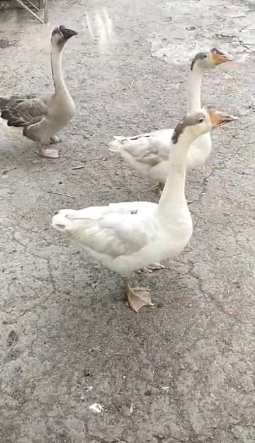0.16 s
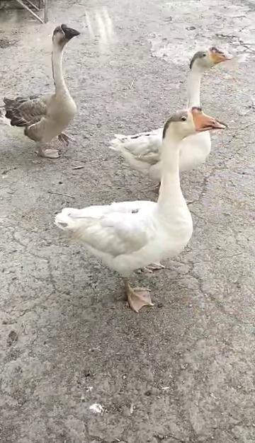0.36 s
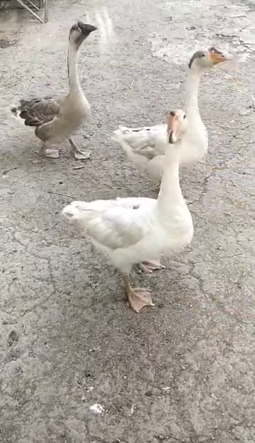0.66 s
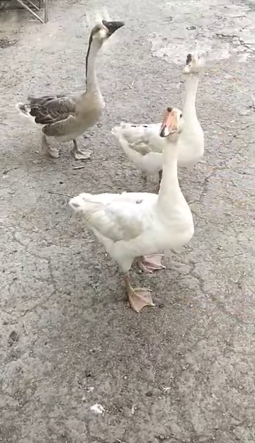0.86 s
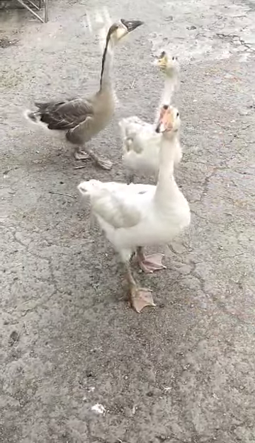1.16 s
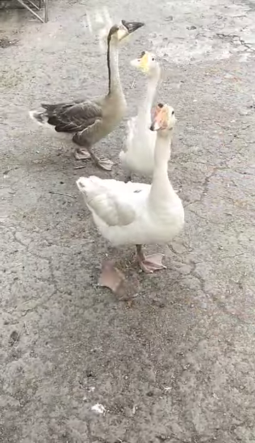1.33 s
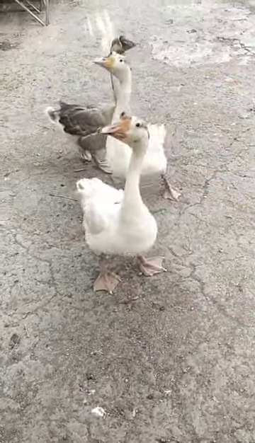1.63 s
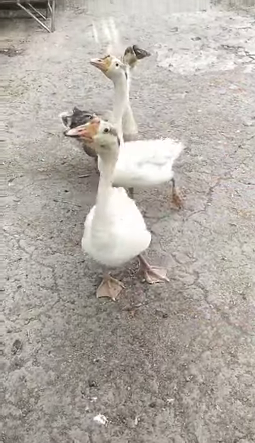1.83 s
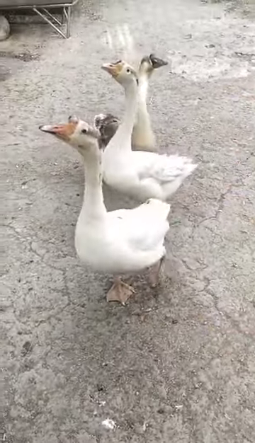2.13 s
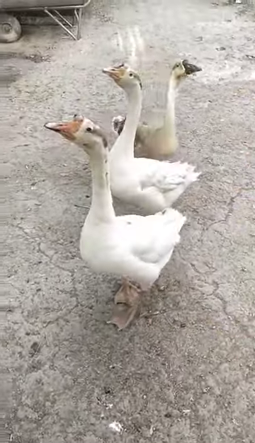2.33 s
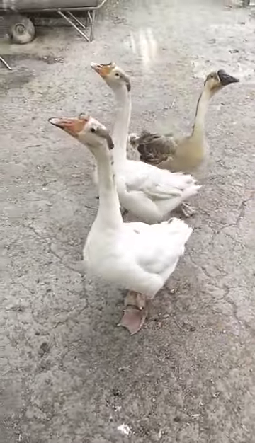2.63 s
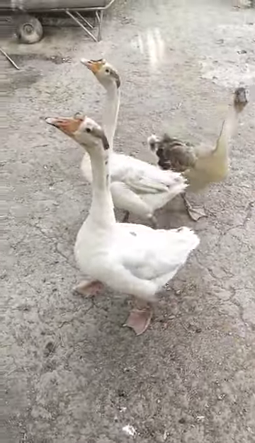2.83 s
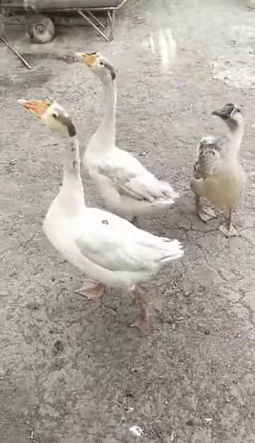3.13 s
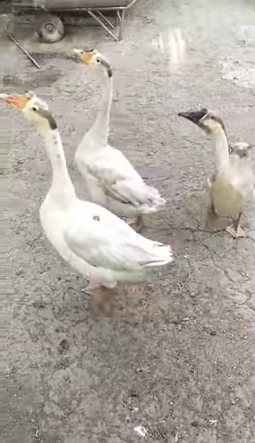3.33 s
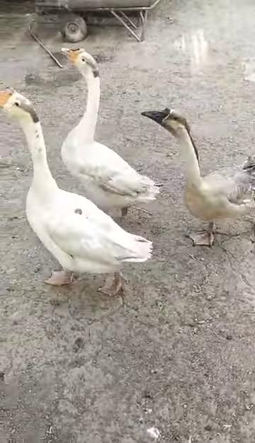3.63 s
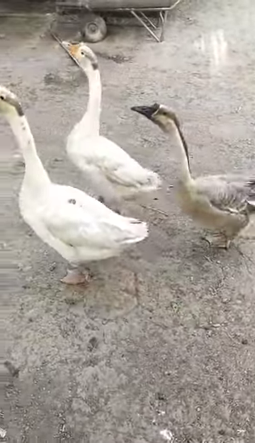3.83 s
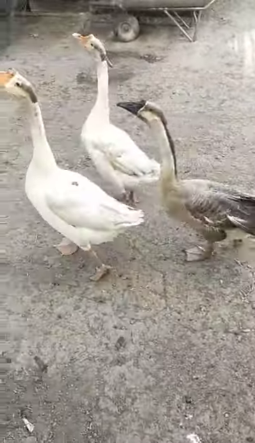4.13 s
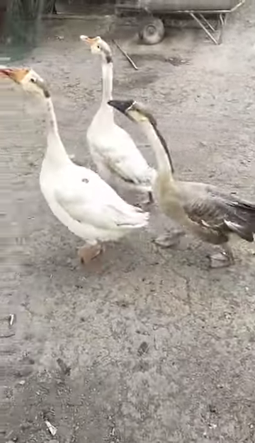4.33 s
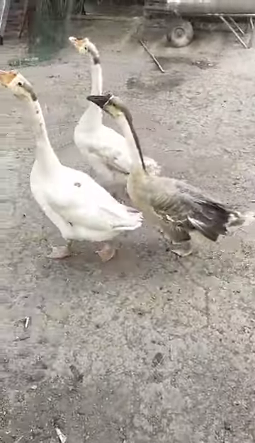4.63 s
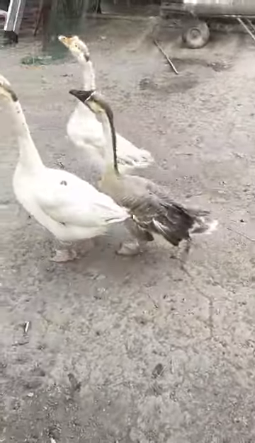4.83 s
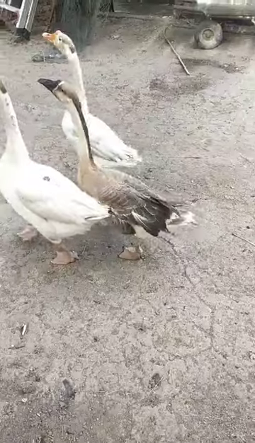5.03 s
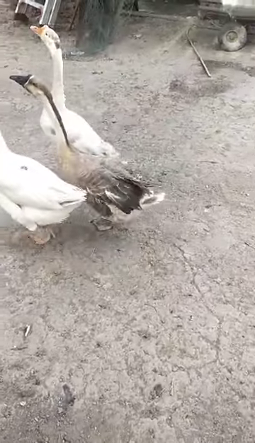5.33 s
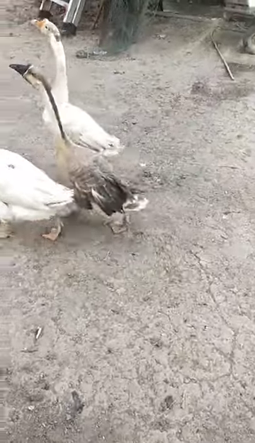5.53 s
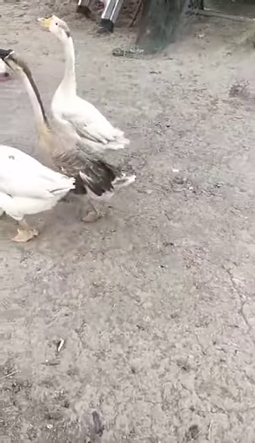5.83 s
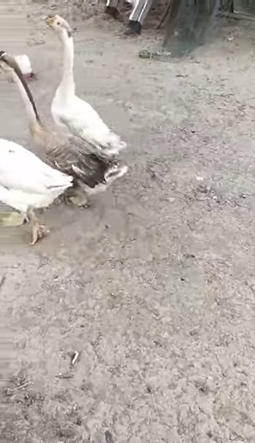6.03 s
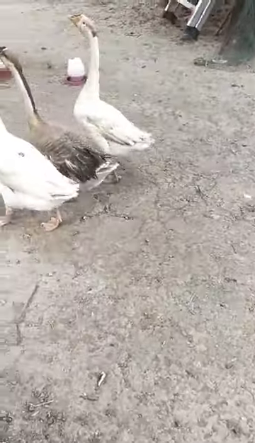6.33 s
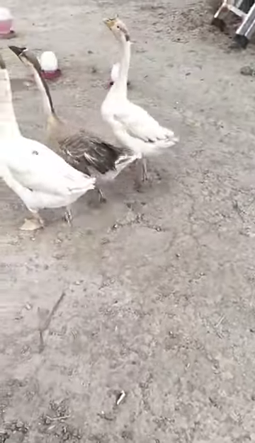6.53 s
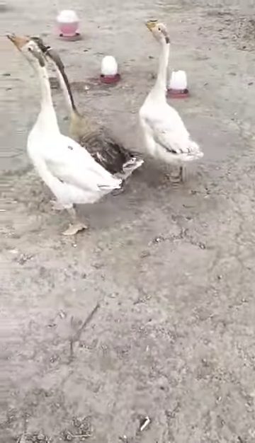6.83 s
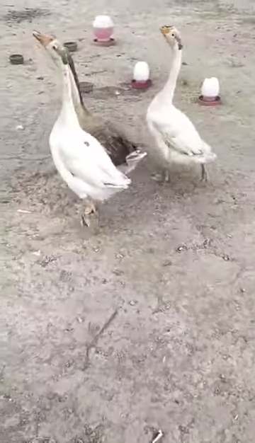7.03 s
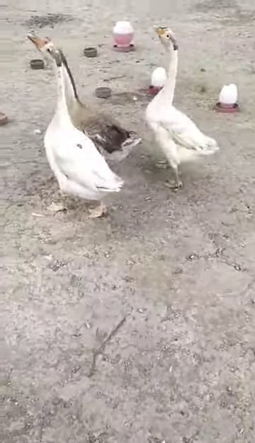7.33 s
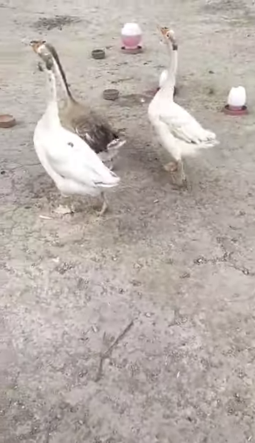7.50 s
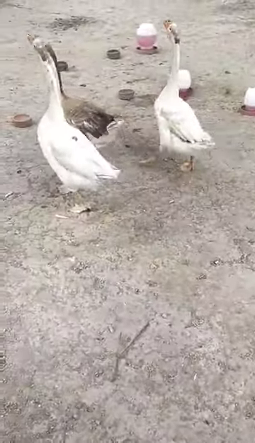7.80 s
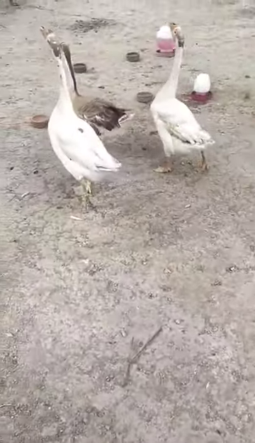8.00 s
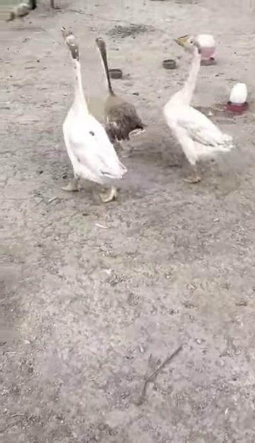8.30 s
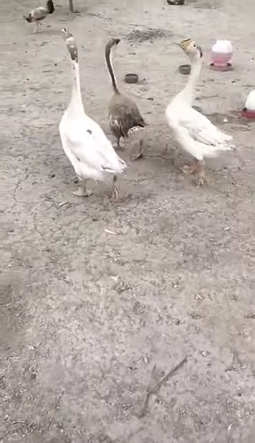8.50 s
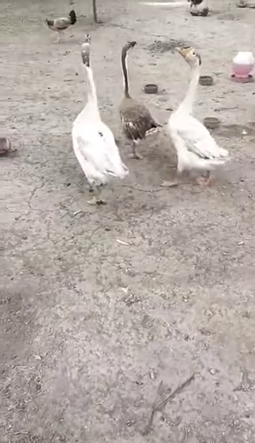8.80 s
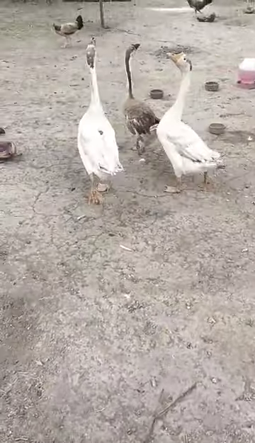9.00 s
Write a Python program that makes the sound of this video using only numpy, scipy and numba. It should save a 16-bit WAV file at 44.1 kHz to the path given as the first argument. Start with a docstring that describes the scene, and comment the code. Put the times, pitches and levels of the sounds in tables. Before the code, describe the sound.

Three geese close by give hoarse, rattling honks that break into brassy trumpet notes, sparse at first, then crowding together, in a quiet open farmyard.

```python
"""Three geese honk a step or two from a phone with two microphone ports, in an open farmyard.
The calls are hoarse rattles of syrinx pulses that ring the windpipe and the open bill.
Many break into clear trumpet notes: gliding harmonics with a buzz of weaker lines between them.
Wheezes and, at the start, a distant chick's high peep are gliding narrow bands of noise; feet on grit tick.
A weak yard echo follows the birds; behind lies a low outdoor rumble of filtered noise."""
import sys
import numpy as np
from scipy import signal
from scipy.fft import rfft, irfft
from scipy.io import wavfile
from scipy.ndimage import uniform_filter1d
from numba import njit

SR = 44100
rng = np.random.default_rng(int(sys.argv[2]) if len(sys.argv) > 2 else 0)


def wav_out(sig):
    """Save sig, one row per channel (or a flat mono array), as 16-bit PCM at SR to the path in sys.argv[1]."""
    wavfile.write(sys.argv[1], SR, np.round(np.clip(np.atleast_2d(sig).T, -1, 1) * 32767).astype(np.int16))


N = 403956
TIME = np.arange(N) / SR

# hoarse calls, with levels and resonances at full effort: start_s, rise_s, hold_s, release_s, swell_db,
# body_db, open_bill_db, rasp_db, hiss_db, sizzle_db, windpipe_hz, bill_hz, body_left_minus_right_db
HOARSE_CALLS = [(0.217, .13, 0.13, 0.027, 16.5, -37.5, -46, -54.5, -66.5, -82, 1060, 3030, -0.5),
                (0.472, 0.1, 0.068, 0.084, 4, -22, -32.5, -36.5, -57, -55.5, 964, 3460, -1),
                (0.61, .19, 0.047, 0.19, 5, -19.5, -30, -35, -38.5, -41.5, 1050, 3350, 1),
                (1.522, 0.19, 0.11, 0.16, 7.5, -21, -30, -34, -64, -49.5, 1000, 2770, 0.5),
                (2.087, 0.018, 0.082, 0.18, 11, -22, -25.5, -35, -42, -46.5, 1204, 4000, 1),
                (2.922, 0.18, 0.045, 0.05, 7, -25.5, -35.5, -41.5, -61, -60, 958, 2940, -0.5),
                (3.114, 0.069, 0.079, 0.17, 13.5, -24, -35, -41, -55.5, -60, 938, 3000, 0.5),
                (3.418, 0.046, 0.17, 0.2, 5, -22.5, -28.5, -36, -42, -49.5, 1098, 3390, 0),
                (4.051, 0.3, 0.51, 0.1, 10, -28, -34.5, -47.5, -62.5, -68.5, 1064, 3080, 0.5),
                (4.499, 0.077, 0.12, 0.2, 13, -26.5, -36.5, -42, -55, -62, 1087, 3200, 0),
                (4.709, 0.079, 0.073, 0.33, 7, -24.5, -41.5, -37, -49, -58, 985, 2980, -3),
                (4.957, 0.24, 0.081, 0.07, 10.5, -22.5, -27, -32.5, -43, -51, 974, 3000, 1.5),
                (5.267, 0.027, 0.035, 0.17, 2, -44, -35, -37, -39.5, -49, 940, 2700, 0),
                (5.695, 0.03, 0.091, 0.22, 8, -30, -33.5, -41.5, -47, -53, 1038, 3930, 2),
                (6.936, 0.061, 0.13, 0.13, 4.5, -28.5, -33.5, -39.5, -49.5, -50.5, 1045, 4030, 3),
                (7.124, 0.05, 0.044, 0.19, 22, -23.5, -34, -41, -54, -54, 1113, 4000, 3),
                (7.388, 0.017, 0.083, 0.15, 16, -23, -20.5, -33, -37.5, -44, 1040, 4340, 1),
                (7.472, 0.043, 0.13, 0.29, -4.5, -28.5, -31, -35, -40, -46.5, 1060, 4400, 4.5),
                (7.796, 0.071, 0.14, 0.17, 11.5, -41, -39, -52.5, -58.5, -57.5, 1045, 4050, 0.5),
                (8.1, 0.031, 0.045, 0.068, 9, -23.5, -25, -43, -42.5, -49, 1087, 4400, 0),
                (8.168, 0.048, 0.13, 0.26, 0, -38, -37, -35, -42, -48, 1040, 4280, -5),
                (8.405, 0.025, 0.044, 0.16, 6, -21, -36, -36.5, -61, -57.5, 1067, 2770, 3)]
# slap rate and unevenness of the syrinx, call after call: time_s, pulse_rate_hz, roughness (0-1)
SYRINX_PULSES = [(.24, 112, .05), (.42, 118, .1), (.47, 145, .35), (.63, 174, .3), (.82, 176, .5),
                 (1.02, 140, .4), (1.52, 146, .4), (1.76, 176, .35), (1.97, 148, .3), (2.09, 150, .7),
                 (2.16, 165, .6), (2.3, 138, .3), (2.92, 136, .35), (3.03, 156, .05), (3.13, 168, .4),
                 (3.22, 173, .25), (3.39, 140, .5), (3.42, 150, .6), (3.52, 158, .4), (3.63, 147, .2),
                 (3.8, 140, .45), (4.06, 112, .2), (4.2, 128, .12), (4.4, 132, .14), (4.47, 140, .15),
                 (4.53, 150, .75), (4.65, 148, .55), (4.8, 146, .4), (4.93, 148, .5), (5.02, 168, .6),
                 (5.27, 176, .5), (5.43, 152, .3), (5.69, 150, .6), (5.77, 158, .45), (5.9, 141, .35),
                 (6.94, 140, .5), (7., 156, .5), (7.2, 150, .25), (7.36, 140, .5), (7.4, 160, .8),
                 (7.6, 175, .45), (7.78, 158, .6), (7.86, 130, .5), (8.1, 150, .7), (8.25, 162, .6),
                 (8.47, 149, .6), (8.58, 138, .4)]
# weaker resonances that move with the windpipe's: multiple of its frequency, level_db
WINDPIPE_OVERTONES = [(0.601, -19.5), (1.25, -2.5), (1.73, -13.5), (2.02, -17)]
# relative response of throat and bill: frequency_hz, gain_db
THROAT_RESPONSE = [(90, -32), (155, 4.5), (240, -14.5), (430, 5.5), (800, 5.5), (1450, 3.5), (1800, -2),
                   (2450, -8.5), (3120, 2.5), (3850, -4.5), (4900, -2), (5700, -16.5), (7100, -14.5),
                   (8800, -18), (11000, -20.5)]
# clear notes within the calls: start_s, attack_s, hold_s, release_s, top_pitch_hz, scoop_hz, fall_hz,
# level_db, octave_db, third_harmonic_db, buzz_share (0-1), fundamental_left_minus_right_db
CLEAR_NOTES = [(0.615, 0.03, 0.18, .14, 884.3, 14, 132.5, -19.5, -26.5, -35, 0.97, 1.5),
               (0.763, 0.038, 0.026, 0.08, 1117, -16, 47.5, -20, -31, -48.5, .4, 36.5),
               (1.709, 0.037, 0.053, 0.16, 879.5, -4, 141.5, -22, -27.5, -32.5, 0.7, 0),
               (2.102, 0.015, 0.08, 0.038, 1091, 20.5, 34, -24.5, -41, -51, 0.7, -32),
               (3.169, 0.012, 0.028, 0.054, 863.6, -9, 12, -18.5, -29.5, -39, 0.3, 5.5),
               (3.447, 0.05, 0.031, 0.11, 1110, 20.5, 27.5, -18.5, -35, -41, 0.89, -13),
               (3.591, 0.029, 0.036, 0.02, 894, 1.5, 6, -20, -29, -44, 0, 5.5),
               (5.076, 0.058, 0.025, 0.1, 866, 4.5, 4, -26, -39, -47, 0, 7),
               (5.259, 0.041, 0.015, 0.11, 889, -16, 129, -16.5, -28.5, -39, 0.03, 0.5),
               (5.723, 0.04, 0.029, 0.051, 1092, 21.5, 21, -28.5, -39.5, -54, 0.53, 38),
               (5.859, 0.019, 0.042, 0.061, 999.4, -15, 27, -35.5, -63, -60, 0, 8),
               (6.977, 0.035, 0.072, 0.078, 1098, -7, -3, -21, -37, -43, 0.4, 14),
               (7.121, 0.018, 0.05, 0.015, 874, 1.5, -21, -26, -34.5, -34.5, 0.4, 0),
               (7.406, 0.067, 0.24, 0.11, 878, 64.5, 105.5, -22, -32.5, -34, 0.6, -1.5),
               (7.446, 0.049, 0.022, 0.016, 1430, 15, 56.5, -19.5, -48, -60, .2, -1.5),
               (7.86, 0.052, 0.042, 0.13, 777, -17, 9, -43, -43, -66.5, 0.39, -5),
               (8.146, 0.069, 0.079, 0.049, 1146, 79.5, 49, -15, -33.5, -48.5, 0.28, 5.5),
               (8.315, 0.036, 0.052, 0.12, 1106, 2.5, 190.5, -12, -41, -54.5, 0, 5)]
# a distant chick's high peep (first two rows), then the geese's thin wheezes:
# start_s, length_s, first_pitch_hz, last_pitch_hz, width_hz, level_db midway
PEEP_AND_WHEEZES = [(.01, 0.16, 4820, 4850, 50, -65), (0.156, 0.11, 4830, 4550, 70, -65.5),
                    (1.416, 0.22, 3780, 3460, 458, -36), (1.918, 0.2, 4440, 4290, 170, -38),
                    (1.929, 0.29, 1470, 1346, 60, -38.5), (1.924, 0.18, 3470, 3250, 489.8, -39),
                    (2.509, 0.19, 3950, 3750, 248, -54.5), (5.471, 0.25, 1657, 1550, 150, -65),
                    (6.334, 0.071, 1954, 1980, 60, -64.5), (6.576, 0.38, 2880, 2540, 130, -64),
                    (6.779, 0.254, 3880, 4020, 254, -53), (6.78, 0.22, 1264, 1420, 110, -60),
                    (7.248, 0.18, 3510, 3660, 220, -29.5), (7.55, 0.074, 1740, 1760, 40, -22.5),
                    (7.715, 0.11, 1687, 1443, 70, -31.5), (7.797, .2, 1612, 1534, 120, -40.5)]
# feet on grit: start_s, level_db at onset
FOOT_TICKS = [(1.094, -51), (6.305, -57), (6.673, -57), (8.766, -47), (8.863, -50)]
# relative spectrum of the outdoor background: frequency_hz, level_db (per Hz)
YARD_SPECTRUM = [(15, -105), (25, -36), (99, 3), (280, -7.5), (520, -15.5), (1950, -22), (3930, -32),
                 (4620, -30.5), (15500, -41)]

# band edges of a call: body, open bill, rasp, hiss, sizzle
BODY_EDGE_HZ, BILL_EDGE_HZ, RASP_EDGE_HZ, SIZZLE_EDGE_HZ = 1430, 2600, 5300, 8000
# effort, in dB below full: it swells ever more slowly, holds, then drops ever faster
SWELL_CURVE, RELEASE_CURVE, RELEASE_DB, EDGE_S = 1.8, 1.71, 26, .006
# the upper bands follow effort more steeply than the body (dB per dB); rasp and hiss share a slope
BILL_SLOPE, RASP_SLOPE, SIZZLE_SLOPE = 1.23, 1.15, 1.5
TREMBLE_DB = 1.5  # spread of the random unsteadiness of effort
PIPE_SLOPE = 0.013  # windpipe and bill resonances rise with effort (octaves per dB)
PIPE_WANDER, PULSE_WANDER = .012, .018  # relative; the pulse wander is scaled by roughness
PIPE_WIDTH_HZ, OVERTONE_WIDTH_HZ, PIPE_DB = 290., 220., 23
BILL_WIDTH_HZ, BILL_DB = 260, 5
RATTLE_YIELD = 0.82  # how fully the rattle's body gives way to a clear note
# a note scoops as it swells, droops while held, and falls as it fades
NOTE_ATTACK_DB, NOTE_RELEASE_DB, NOTE_FADE_CURVE = 10.5, 20.5, 1.95
DROOP_HZ_PER_S, HIGH_DROOP_HZ_PER_S, FALL_CURVE = 56, 264, 0.87
# the octave comes in after the note and fades slightly more slowly
OCTAVE_ATTACK_DB, OCTAVE_LINGER_DB = 17.5, 0.5
# above the third each harmonic is weaker; they outlast the fundamental
BRASS_STEP_DB, BRASS_LINGER_DB = -4.5, 3.5
BRASS_SMEAR = .42  # phase wander (rad), growing with the harmonic
BRASS_BILL_DB, BRASS_BILL_WIDTH_HZ = 4.5, 90  # a harmonic lights up as it crosses the bill resonance
UNDERTONE_DB = -30.5  # a weak line below the note, relative to it
YARD_DB = -56  # before a slow drift
TOP_HZ = 15900


def geese(air=7.1, body_lock=0.066, bill_lock=0.92, rasp_lock=0.8):
    """Rattle and buzz sound through the throat; the stronger the clear note, the more the buzz takes over."""
    levels, (pipe_hz, bill_hz) = efforts()
    clear, buzz, buzziness = trumpet(bill_hz)
    times, rates, roughness = np.transpose(SYRINX_PULSES)
    rough = np.interp(TIME, times, roughness)
    pulse_hz = np.interp(TIME, times, rates) * (1 + PULSE_WANDER * rough * walk(25))
    slaps, puffs = rattle(pulse_hz, rough)

    # lock is the clear note's share of power against the rattle's body
    note_power = np.maximum(uniform_filter1d(np.mean(clear ** 2, axis=0), size=400), 0)
    lock = note_power / (note_power + np.mean(levels[0] ** 2, axis=0) + 1e-9)
    levels[0] *= (1 - lock) ** RATTLE_YIELD

    # air hisses higher up, in the bill, the more the rougher the call
    ringing = undb(PIPE_DB) * windpipe(slaps, pipe_hz) + slaps
    hiss = air * rough * butter(puffs, 1500, "high", order=2)
    hoarse = colour(ringing + hiss, THROAT_RESPONSE)[0]
    hoarse = hoarse + undb(BILL_DB) * resonance(hoarse, bill_hz, BILL_WIDTH_HZ)
    buzz = colour(buzz, THROAT_RESPONSE)[0]

    # edges, filter kind, greatest buzz share, scatter_db
    bands = [(BODY_EDGE_HZ, "low", body_lock, -5),
             ([BODY_EDGE_HZ, BILL_EDGE_HZ], "band", bill_lock, -3),
             ([BILL_EDGE_HZ, RASP_EDGE_HZ], "band", rasp_lock, 1.5),
             ([RASP_EDGE_HZ, SIZZLE_EDGE_HZ], "band", rasp_lock, 2),
             (SIZZLE_EDGE_HZ, "high", rasp_lock, 3)]
    out = clear
    for gain, (edge, kind, most, scatter_db) in zip(levels, bands):
        share = np.clip(most * lock * buzziness, 0, 1)
        rough_part, locked_part = (steady(butter(x + 1e-18, edge, kind, order=6)[None])[0]
                                   for x in (hoarse, buzz))
        grain = np.sqrt(1 - share) * rough_part + np.sqrt(share) * locked_part
        out = out + gain * steady(ports(grain, scatter_db, scatter_s=0.029))
    return out


def efforts(bill_pan_db=0.5, rasp_pan_db=-3.5, hiss_pan_db=-0.5, sizzle_pan_db=4):
    """Each call's effort sets its band levels and its windpipe and bill resonances."""
    levels, throat_hz = np.zeros((5, 2, N)), np.zeros((2, N))
    throat_hz[:] = np.array(HOARSE_CALLS[0][10:12])[:, None]
    tremble = TREMBLE_DB * walk(16.0)
    slopes = (1, BILL_SLOPE, RASP_SLOPE, RASP_SLOPE, SIZZLE_SLOPE)
    for start, rise, hold, release, swell_db, *bands_db, pipe_hz, bill_hz, pan_db in HOARSE_CALLS:
        where, gate, (rising, _, falling) = stages(start, rise, hold, release, EDGE_S)
        effort = -swell_db * (1 - rising) ** SWELL_CURVE - RELEASE_DB * falling ** RELEASE_CURVE
        effort = effort + tremble[where]
        pans_db = (pan_db, bill_pan_db, rasp_pan_db, hiss_pan_db, sizzle_pan_db)
        for band, db, slope, side_db in zip(levels, bands_db, slopes, pans_db):
            call = pan(side_db) * gate * undb(db + slope * effort)
            band[:, where] = np.hypot(band[:, where], call)  # overlapping calls add in power
        throat_hz[:, where] = np.array([[pipe_hz], [bill_hz]]) * 2 ** (PIPE_SLOPE * effort)
    return levels, throat_hz * (1 + PIPE_WANDER * walk(31))


def rattle(hz, rough, scatter_db=6.0, rebound=1.9, puff=0.78):
    """Syrinx slaps, early or late and rebounding within the cycle when rough; a puff of air follows each."""
    cycles = np.cumsum(hz) / SR
    times = np.interp(np.arange(1, cycles[-1]), cycles, TIME)
    early, strong, bounce = rng.standard_normal((N // 100, 3))[:len(times)].T
    unrest, period = np.interp(times, TIME, rough), np.gradient(times)
    times = times + .09 * unrest ** 2 * period * early
    rebounds = times + bounce % 1 * period
    sizes = np.append(undb(scatter_db * unrest * strong), rebound * unrest ** 2)
    samples = (np.append(times, rebounds) * SR).astype(int)
    pulses = np.bincount(samples, sizes, minlength=N)[:N]
    puffs = np.exp(-(cycles % 1) / puff) * rng.standard_normal(N)
    return unit(pulses), unit(puffs)


def windpipe(slaps, hz):
    """Each slap rings the long windpipe; every resonance swells and fades, with deep valleys between them."""
    def ring(centre_hz, width_hz):
        return resonance(resonance(slaps, centre_hz, width_hz), centre_hz, width_hz)
    overtones = sum(undb(db) * ring(multiple * hz, OVERTONE_WIDTH_HZ) for multiple, db in WINDPIPE_OVERTONES)
    return ring(hz, PIPE_WIDTH_HZ) + overtones


def trumpet(bill_hz, waver=.0028, flutter=0.0046, shimmer_db=1.0, between_db=-8, lag_s=0.00014,
            fade_s=.012, slip=0.9):
    """Membranes lock to the windpipe: returns clear notes with harmonics, a buzz, and the buzz's share."""
    clear, buzz, buzziness = np.zeros((2, N)), np.zeros(N), np.zeros(N)
    for (start, attack, hold, release, hz, scoop_hz, fall_hz, db, octave_db, brass_db,
         share, pan_db) in CLEAR_NOTES:
        where, gate, (rising, held, falling) = stages(start, attack, hold, release, fade_s)
        count = len(TIME[where])
        buzziness[where] = np.maximum(buzziness[where], share * gate)

        droop = DROOP_HZ_PER_S if hz < 1000 else HIGH_DROOP_HZ_PER_S
        arch = hz - scoop_hz * (1 - rising) ** 2 - droop * hold * held - fall_hz * falling ** FALL_CURVE
        pitch = arch * (1 + waver * walk(50, count) + flutter * walk(440, count))
        phase = 2 * np.pi * np.cumsum(pitch) / SR
        at_ports = phase - 2 * np.pi * pitch * np.array([[lag_s], [0]])  # the left port hears it later

        gate = gate * undb(-NOTE_ATTACK_DB * (1 - rising) ** 2 - NOTE_RELEASE_DB * falling ** NOTE_FADE_CURVE)
        gate = gate * undb(shimmer_db * walk(82, count))
        first = gate * undb(db)
        second = gate * undb(octave_db - OCTAVE_ATTACK_DB * (1 - rising) + OCTAVE_LINGER_DB * falling)
        fundamental = pan(pan_db) * first * np.sin(at_ports)
        octave = pan(3.3) * second * np.sin(2 * at_ports)
        clear[:, where] += np.sqrt(2) * (fundamental + octave)

        late_db = OCTAVE_ATTACK_DB * (1 - (rising + held) / 2)
        brass = gate * undb(brass_db - late_db + BRASS_LINGER_DB * falling)
        for k in range(3, 7):
            lit_db = BRASS_BILL_DB / (1 + ((k * pitch - bill_hz[where]) / BRASS_BILL_WIDTH_HZ) ** 2)
            smear = BRASS_SMEAR * (k - 2) * walk(110, count) + rng.uniform(0, 2, (2, 1))
            level = brass * undb(BRASS_STEP_DB * (k - 3) + lit_db + 3 * walk(35, count))
            clear[:, where] += level * np.sin(k * phase + smear)

        # low notes repeat every third cycle, high notes every second:
        # weaker, unsteady lines between the harmonics
        cycles = 3 if hz < 1000 else 2
        undertone = np.sin((1 - 1 / cycles) * at_ports + slip * walk(51, count))
        clear[:, where] += first * undb(UNDERTONE_DB) * undertone
        for k in range(cycles + 1, 12 * cycles):
            if k % cycles or k > 3 * cycles:
                drift = rng.uniform(0, 2 * np.pi) + slip * walk(48, count)
                line_db = between_db if k % cycles else 0
                buzz[where] += first * undb(line_db) * np.sin(k / cycles * phase + drift)
    return clear, buzz, buzziness


def peep_and_wheezes(hiss_db=-10):
    """Chick's peep, then air through a goose's narrow glottis: gliding, smeared whistles in a little hiss."""
    out = np.zeros(N)
    hiss = unit(butter(rng.standard_normal(N), [1100, 4500], "band", order=4))
    for start, length, first_hz, last_hz, width_hz, db in PEEP_AND_WHEEZES:
        where, _ = span([max(start, 0), start + length], 0.003)
        u = np.linspace(0, 1, len(TIME[where]))
        carrier = np.exp(2j * np.pi * np.cumsum(first_hz + (last_hz - first_hz) * u) / SR)
        smear = walk(width_hz / 2, len(u)) + 1j * walk(width_hz / 2, len(u))
        whistle = np.real(carrier * smear)
        swell = 2 * np.sqrt(u * (1 - u))
        out[where] += undb(db) * swell * (whistle + undb(hiss_db) * hiss[where])
    return ports(out, scatter_db=-8, scatter_s=.004)


def steps(decay_s=0.0043):
    """Webbed feet nudge grit: short dry ticks of decaying noise."""
    knocks = sum(undb(db) * (TIME >= s) * np.exp(-np.abs(TIME - s) / decay_s) for s, db in FOOT_TICKS)
    return knocks * unit(butter(rng.standard_normal((2, N)), [600, 6000], "band", order=1))


def ports(x, scatter_db, scatter_s, size=600):
    """The left port hears it a little later; scatter off ground and bodies shifts as the birds move."""
    out = np.array([np.roll(x, 6), x])
    for _ in range(2):
        response = rng.standard_normal((2, size)) * np.exp(-np.arange(size) / SR / scatter_s)
        response[:, :12] = 0  # scatter arrives after the direct sound
        response /= np.sqrt(np.sum(response ** 2, axis=1, keepdims=True))
        shifting = butter(x, 230, "high", order=2) * np.sin(2 * walk(1.97))
        out += undb(scatter_db) * convolve(shifting, response)
    return out


def yard_echo(x, wet_db=-28, t60_s=0.94, damp_hz=7000, gap_s=0.015):
    """Sheds and walls return a weak tail, modelled as decaying noise after a short gap."""
    t = TIME[:SR]
    noise = butter(rng.standard_normal((2, SR)), min(damp_hz, 18000), "low", order=1)
    tail = noise * np.exp(-np.log(1000) * t / t60_s) * (t > gap_s)
    return undb(wet_db) * convolve(x.mean(axis=0), tail / np.sqrt(np.sum(tail ** 2) / 2))


def background(side_db=-22):
    """Distant rumble, nearly alike at both ports, under a faint wide hiss."""
    mid, side = rng.standard_normal((2, N))
    side = butter(side, 440, "high", order=2) + undb(side_db) * side
    air = colour(mid + side * np.array([[1], [-1]]), YARD_SPECTRUM, size=8192)
    drift_db = np.interp(TIME, [0, N / SR], [2.5, -1])
    return unit(air) * undb(YARD_DB + drift_db)


def undb(db):
    """Amplitude ratio of a level in dB."""
    return 10 ** (np.asarray(db) / 20)


def unit(x):
    """Scale to an RMS of 1."""
    return x / np.sqrt(np.mean(x ** 2))


def steady(x):
    """Hold the level at 1 over a few hundredths of a second, so that only the grain is left."""
    power = uniform_filter1d(uniform_filter1d(np.mean(x ** 2, axis=0), size=1100), size=700)
    return x / np.sqrt(np.maximum(power, 0) + 1e-12)


def butter(x, hz, kind, order=4):
    """Butterworth filter with the given edges."""
    return signal.sosfilt(signal.butter(order, hz, kind, fs=SR, output="sos"), x)


def convolve(x, response):
    """Convolve each channel, cut to the scene's length."""
    return signal.oaconvolve(np.atleast_2d(x), np.atleast_2d(response), axes=1)[:, :N]


def colour(x, points, size=2048):
    """Causal minimum-phase filter with the given (Hz, dB) response."""
    hz, db = np.transpose(points)
    bins_hz = np.arange(size // 2 + 1) * SR / size
    gain = undb(np.interp(np.log(bins_hz + 1), np.log(hz), db))
    cepstrum = irfft(np.log(gain))
    cepstrum[1:size // 2] *= 2
    cepstrum[size // 2 + 1:] = 0
    return convolve(x, irfft(np.exp(rfft(cepstrum))))


@njit
def resonance(x, hz, width):
    """Band-pass whose centre moves, gain 1 at the centre."""
    y, band, low = np.empty(len(x)), 0., 0.
    for i in range(len(x)):
        g, k = np.tan(np.pi * hz[i] / SR), width / hz[i]
        v = (band + g * (x[i] - low)) / (1 + g * (g + k))
        band, low, y[i] = 2 * v - band, low + 2 * g * v, k * v
    return y


def walk(hz, count=N):
    """Smooth random wander of spread 1."""
    return unit(butter(rng.standard_normal(count + SR // 4), hz, "low", order=2)[-count:])


def pan(db):
    """Left and right gains of equal total power, from left minus right in dB."""
    return unit(undb(np.array([[db], [-db]]) / 2))


def span(times, fade_s):
    """The samples of a sound and its fades at both ends."""
    first, last = times[0] - fade_s, times[-1] + fade_s
    where = slice(max(int(first * SR), 0), min(int(last * SR), N))
    return where, np.interp(TIME[where], [first, times[0], times[-1], last], [0, 1, 1, 0])


def stages(start, attack, hold, release, fade_s):
    """The samples of a sound, its fades, and its progress (0-1) through attack, hold and release."""
    corners = start + np.cumsum([0, attack, hold, release])
    where, gate = span(corners, fade_s)
    return where, gate, [np.interp(TIME[where], corners[k:k + 2], [0, 1]) for k in range(3)]


def scene():
    """Geese near the microphones, a distant chick, their echo off the yard, and the outdoor background."""
    birds = geese() + peep_and_wheezes() + steps()
    return birds + yard_echo(birds) + background()


def record(dry):
    """The phone cuts the top with a steep low-pass."""
    return signal.sosfilt(signal.ellip(10, .2, 80, TOP_HZ, fs=SR, output="sos"), dry)


dry = scene()
out = record(dry)
wav_out(out)
```